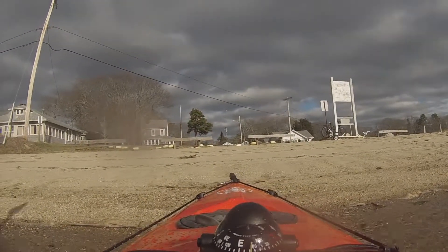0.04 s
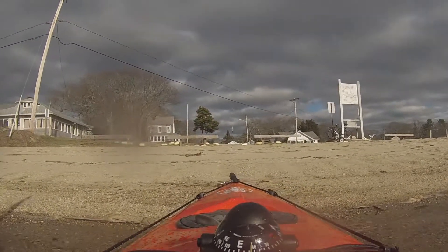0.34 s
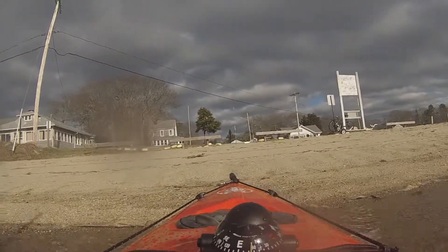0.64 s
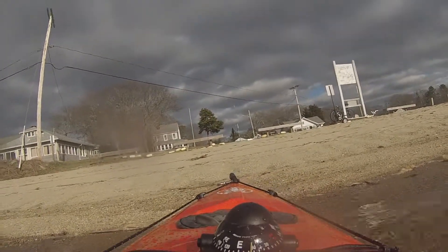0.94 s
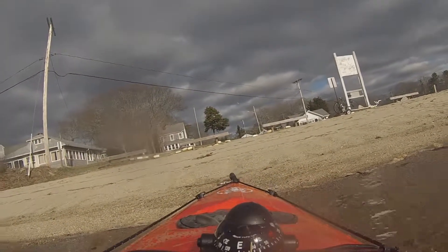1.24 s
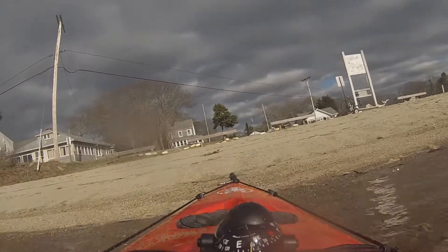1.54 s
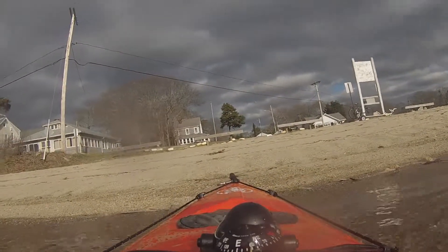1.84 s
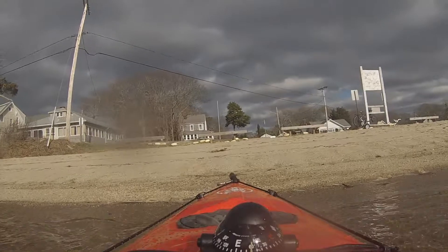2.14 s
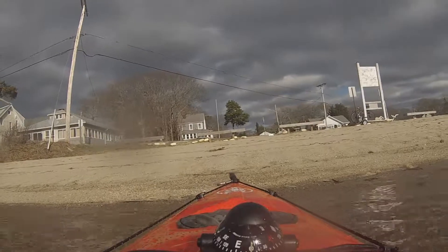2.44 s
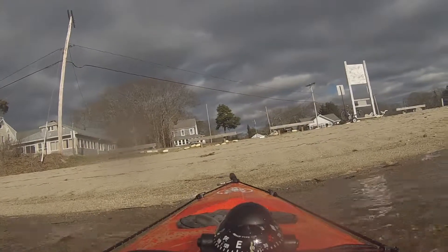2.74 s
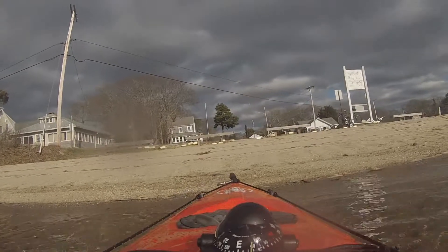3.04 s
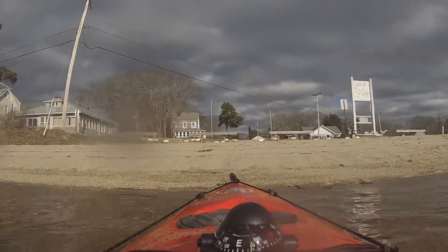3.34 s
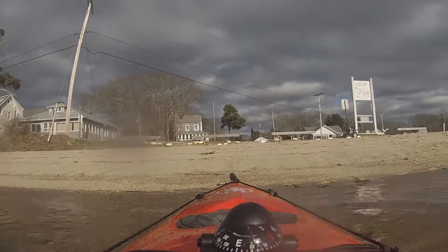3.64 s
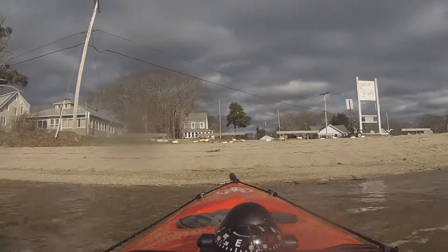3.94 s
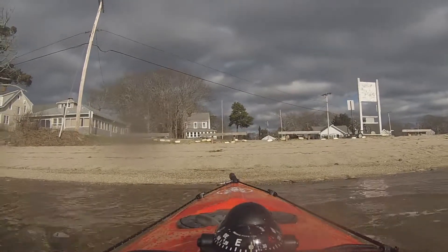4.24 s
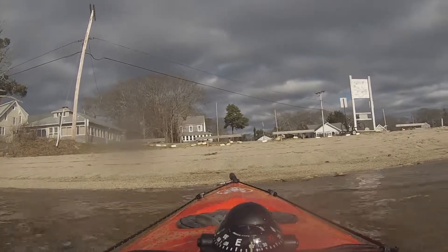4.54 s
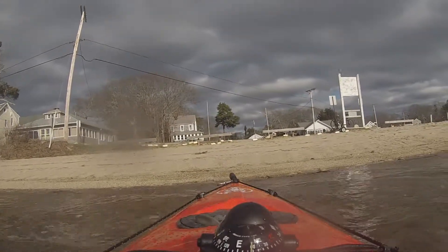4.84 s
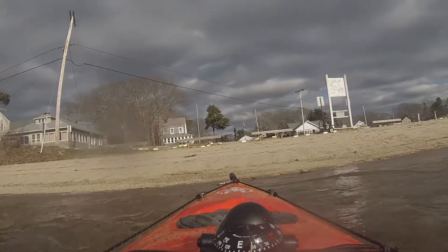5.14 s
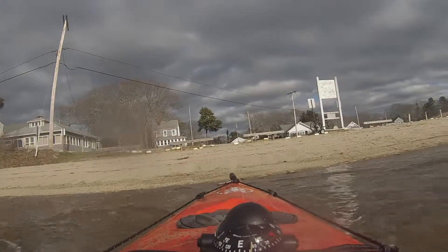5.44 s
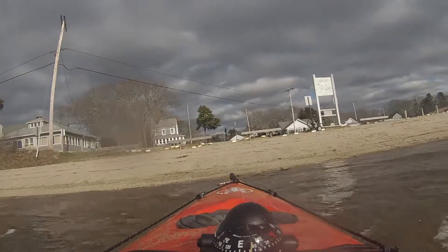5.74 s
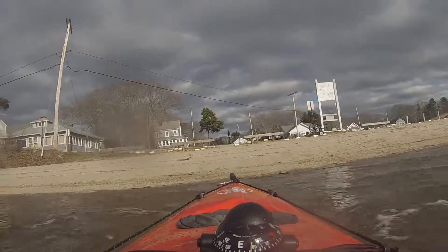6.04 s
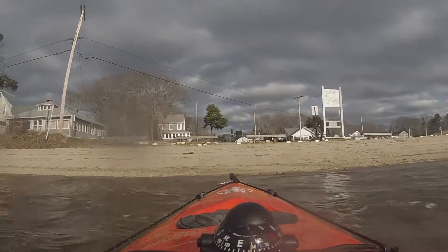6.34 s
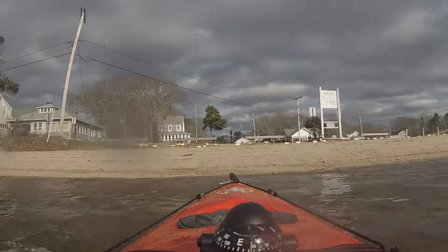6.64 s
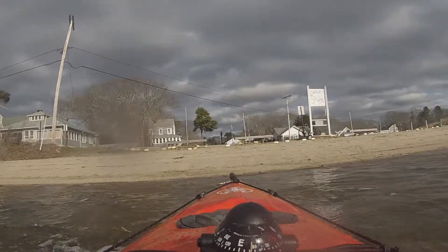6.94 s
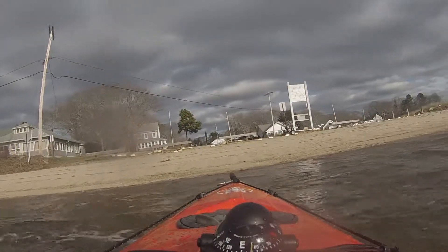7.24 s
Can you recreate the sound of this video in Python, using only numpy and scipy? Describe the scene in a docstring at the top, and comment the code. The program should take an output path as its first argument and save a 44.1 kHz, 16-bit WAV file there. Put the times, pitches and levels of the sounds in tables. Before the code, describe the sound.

A loud hollow bang opens the sound as a plastic kayak is shoved off a gravel beach, heard close from its deck. Stones grind under the booming hull, with crunches near 0.8 seconds and heavy thumps around 0.9 and 1.3 seconds. Meanwhile a paddle digs into wet sand in short hisses. The scraping fades and stops at about 2.2 seconds as the boat floats, and a few drops tick sharply near the microphone.

The rest is much quieter. From 2.7 seconds to the end at about 7.5 seconds, six soft paddle strokes slosh and fizz, roughly one a second, with drips and bubbly plops, the clearest plop near 6.7 seconds. Ripples nudge the hull with small dull knocks that slowly grow. A light wind rumbles and hisses faintly throughout.

```python
"""A plastic kayak is pushed backwards off a gravel beach, heard by a camera on its deck.
First a shove bangs the hollow hull, which booms. Stones then grind under it and make it ring,
while the paddle digs into wet sand. After about two seconds the boat floats free.
Soft paddle strokes slosh, bubble and drip, and ripples nudge the hull.
A light wind rumbles throughout."""
import sys
import numpy as np
from scipy import signal
from scipy.fft import rfft, irfft
from scipy.io import wavfile

SR = 44100
rng = np.random.default_rng(int(sys.argv[2]) if len(sys.argv) > 2 else 0)


def transcribe(signal):
    """Save signal, clipped to [-1, 1], as a 16-bit WAV file at the path in sys.argv[1]."""
    frames = np.atleast_2d(signal).T
    limited = np.clip(frames, -1, 1)
    pcm = np.round(limited * 32767).astype(np.int16)
    wavfile.write(sys.argv[1], SR, pcm)


N = 330309
TIME = np.arange(N) / SR
STERN_WET_S = 1.2  # the back of the boat is in the water by now

# tones at which the hull's plastic walls ring: f/Hz, width/Hz, boost/dB
PANELS = [(160, 16, 4), (220, 40, 3), (350, 18, 5), (392, 30, 4), (648, 22, 5), (746, 26, 5), (910, 80, 5),
          (1152, 110, 8), (1533, 50, 7), (1887, 40, 10), (2520, 240, 8), (3281, 50, 8), (3720, 320, 8),
          (4590, 140, 6), (5050, 170, 9), (5850, 300, 3), (7050, 200, 3), (8603, 70, 7), (9060, 220, 7),
          (10200, 700, 3)]
# tones the camera case boosts in sound from the near side of the boat: f/Hz, width/Hz, boost/dB
NEAR_SIDE = [(1100, 300, 5.5), (1595, 98, 9.5), (2330, 176, 5), (2700, 220, 9), (3680, 500, 12.5),
             (5100, 200, 1), (5910, 250, 8), (6390, 1200, 6.5), (10500, 1300, 6)]
# paddle strokes: t/s, length/s, slosh level/dB, spray level/dB, share from the far side (0 to 1)
STROKES = [(2.7, 0.65, -64.5, -67.5, 0.92), (3.583, 0.78, -60, -62.5, 0.27), (4.841, 0.72, -62.5, -63.5, 1),
           (5.72, 0.83, -61, -65, 0.28), (6.332, 0.56, -63.5, -60, 0.35), (6.99, 1, -60.5, -64.5, 0.65)]


def gain_of(db):
    """Turns decibels into a factor to multiply a sound by."""
    return 10 ** (np.asarray(db) / 20)


def unit_rms(x):
    """Scales a sound to an average size (rms) of 1."""
    return x / np.sqrt(np.mean(x ** 2) + 1e-20)


def unit_peak(x):
    """Scales a sound so that its biggest swing is 1."""
    return x / (abs(x).max() + 1e-20)


def ramp(x):
    """Keeps a value between 0 and 1."""
    return np.clip(x, 0, 1)


def add(mix, s, sound):
    """Mixes a sound in at s seconds."""
    part = mix[max(round(s * SR), 0):][:len(sound)]
    part += sound[:len(part)]


def wander(per_s):
    """A smooth random curve that swings up to about per_s times a second."""
    hz = np.fft.rfftfreq(N, 1 / SR)
    return unit_rms(irfft(rfft(rng.standard_normal(N)) / (1 + (hz / per_s) ** 4), N))


def colour(x, spectrum, modes=(), tilt_db=0, size=8192):
    """Shapes a sound's tone with a broad curve, ringing tones (modes) and a tilt per octave."""
    hz = np.fft.rfftfreq(size, 1 / SR) + 1
    f, db = np.transpose(spectrum)
    db = np.interp(np.log(hz), np.log(f), db) + tilt_db * np.log2(np.maximum(hz, f[1]) / f[1])
    for centre, width, boost in modes:
        db = db + boost / (1 + (2 * (hz - centre) / width) ** 2)
    log_gain = np.log(gain_of(np.r_[db, db[-2:0:-1]]))
    response = np.exp(np.conj(signal.hilbert(log_gain)))  # rings after a hit, never before it
    ring = np.fft.ifft(response).real[:size // 2]
    return signal.oaconvolve(x, ring)[:len(x)]


def clicks(count, per_s, spread_db):
    """Tiny hits at random moments: many small, a few large."""
    sizes = gain_of(spread_db * np.minimum(rng.exponential(1, count), 4.5))
    return sizes * rng.choice([-1, 1], count) * (rng.random(count) < per_s / SR)


def wind():
    """A light breeze: gusty rumble at the microphone and an even hiss from the shore."""
    breeze_tone = [(15, 5.5), (45, 14), (110, 7.5), (190, 4.5), (600, -3), (1800, -9), (4500, -15.5),
                   (8000, -17.5), (11000, -22), (15000, -25.5)]  # steady moving air: f/Hz, level/dB
    air = unit_rms(colour(rng.standard_normal(N), breeze_tone))
    rumble = signal.sosfilt(signal.butter(4, 110, fs=SR, output="sos"), rng.standard_normal(N))
    return gain_of(-60) * air + gain_of(-59 + 2.2 * wander(per_s=6)) * unit_rms(rumble)


def ripple_gain(growth_db_per_s=1.66, swell_db=4):
    """How strong the ripples are: they come in uneven swells and grow away from the shore."""
    db = growth_db_per_s * (TIME - TIME.mean()) + swell_db * wander(per_s=5.9)
    return ramp(TIME - STERN_WET_S) * gain_of(db)


def lapping():
    """Ripples pat the sides of the hull with small dull knocks."""
    pat_tone = [(60, -11), (130, 3.5), (190, -4.5), (300, -14.5), (600, -29), (2000, -49)]  # water patting plastic: f/Hz, level/dB
    strength = gain_of(-76) * ripple_gain()
    return strength * unit_rms(colour(clicks(N, per_s=180, spread_db=3), pat_tone, PANELS))


def bubble(hz, cycles, glide, size=4096):
    """A bubble rings and fades over some cycles, its pitch rising as it nears the surface."""
    turns = hz * np.arange(size) / SR
    age = np.minimum(turns / cycles, 10)
    return np.sin(2 * np.pi * turns * (1 + glide * age)) * np.exp(-age) * (1 - np.exp(-2 * turns))


def froth(low_hz, high_hz, per_s, spread_db, cycles, count=28):
    """Bubbles of many sizes, each size ringing at its own random moments."""
    out = np.zeros(N)
    for hz in np.geomspace(low_hz, high_hz, count) * rng.uniform(.95, 1.05, count):
        ping = np.sqrt(hz) * unit_rms(bubble(hz, cycles, glide=0.014))
        out += signal.oaconvolve(clicks(N, per_s / count, spread_db), ping)[:N]
    return unit_rms(out)


def drips(per_stroke=3, small_db=-50, small_hz=3950, fade_s=0.026):
    """Each drop lands in the water with a short spatter and the ping of a small bubble."""
    big_drops = [(2.3575, -45, 2330), (2.9604, -46.5, 2110), (3.032, -44.5, 4460), (3.0879, -44.5, 2450),
                 (3.269, -47, 4900), (3.4535, -50.5, 3080), (3.8675, -46.5, 2570), (4.1878, -47, 2550),
                 (5.0574, -48, 2080), (5.1896, -47, 2250), (5.2905, -47.5, 2700), (5.3474, -51, 3300),
                 (5.501, -47.5, 3800), (5.7583, -49, 3600), (6.6233, -42.5, 4030), (6.6375, -45, 4400)]  # the loudest drops: t/s, level/dB, f/Hz
    out, t = np.zeros(N), np.arange(4096) / SR
    # smaller drops run off the blade in the second half of each stroke
    small_drops = [(s + length * (1 + late) / 2, small_db, small_hz * 2 ** (pitch - .5))
                   for s, length, *_ in STROKES for late, pitch in rng.random((per_stroke, 2))]
    for s, db, hz in list(big_drops) + small_drops:
        spatter = rng.standard_normal(len(t)) * (1 - np.exp(-t / .0012)) * gain_of(-60 * t / fade_s)
        splash = unit_peak(colour(spatter, [(hz / 4, -20), (hz, 0), (hz * 2, -7), (hz * 4, -34)]))
        add(out, s, gain_of(db - 2) * splash)
        add(out, s + .001, gain_of(db - 4) * bubble(hz, cycles=17, glide=.009))
    return out


def drops_on_case():
    """A drop hits the stiff camera case: one dry snap and a trace of spatter."""
    hits = [(1.4355, -41, 10500), (1.4406, -36, 7000), (2.098, -41, 4300), (2.173, -30, 4160),
            (5.76, -37, 2820), (6.858, -35, 4140)]  # drops on the case: t/s, level/dB, middle f/Hz
    out, t = np.zeros(N), np.arange(2048) / SR
    for s, db, hz in hits:
        snap = (t == 0) + 0.1 * rng.standard_normal(len(t)) * gain_of(-60 * t / 0.0086)
        tone = [(hz / 3, -30), (hz * 0.79, -8), (hz * 0.63, 0),
                (hz * 1.33, -1), (hz * 1.6, -13), (hz * 3, -21)]
        add(out, s, gain_of(db - 1.5) * unit_peak(colour(snap, tone)))
    return out


def plops(pieces=5):
    """Water closes over a pocket of air, which breaks into a few smaller bubbles."""
    pockets = [(2.96, -46, 915), (3.616, -43, 615), (3.71, -40, 1190), (3.729, -44.5, 385),
               (3.869, -43, 1073), (4.162, -49.5, 381), (4.816, -46.5, 464), (4.944, -46.5, 1100),
               (5.865, -41.5, 352), (6.129, -45, 313), (6.723, -34, 820), (7.048, -42, 1160),
               (7.107, -44, 920)]  # air trapped around blade and hull: t/s, level/dB, f/Hz
    out = np.zeros(N)
    for s, db, hz in pockets:
        add(out, s, gain_of(db - 5.5) * bubble(hz, cycles=5, glide=0.031))
        for delay, pitch in rng.random((pieces, 2)):
            piece = bubble(hz * 2 ** (1.56 * pitch - .5), cycles=5, glide=0.047)
            add(out, s + 0.016 * delay, gain_of(db - 18.5) * piece)
    return out


def water_gains(catch_s=0.12, fade_db_per_s=11, build_s=0.22, lift_s=0.19, slap_s=0.026):
    """How strong slosh and spray are: calm water, paddle strokes and slaps add up in power."""
    slaps = [(4.45, -59, -86), (6.14, -58, -58), (6.445, -62, -53.5), (6.64, -75, -67), (6.729, -54.5, -60),
             (7.48, -56.5, -58)]  # small waves slapping the boat: t/s, slosh level/dB, spray level/dB
    wet = ramp(TIME / STERN_WET_S) ** 4
    parts = [(gain_of(-69) * wet, gain_of(-65.5) * wet)]  # slosh and spray of calm water
    # the blade catches and the slosh dies away, while spray builds until the blade lifts out
    for s, length, slosh_db, spray_db, _ in STROKES:
        age = np.clip(TIME - s, 0, length)
        blade_in = ramp((length - age) / lift_s)
        slosh = ramp(age / catch_s) * gain_of(slosh_db - fade_db_per_s * (age - catch_s))
        spray = ramp(age / build_s) * gain_of(spray_db)
        parts.append((blade_in * slosh, blade_in * spray))
    for s, slosh_db, spray_db in slaps:
        burst = 1 / (1 + ((TIME - s) / slap_s) ** 2)
        parts.append((gain_of(slosh_db) * burst, gain_of(spray_db) * burst))
    return np.sqrt(sum(np.square(part) for part in parts))


def water():
    """Large bubbles gurgle in the slosh; fine spray and small bubbles fizz above them."""
    slosh_tone = [(100, -18), (220, -3.5), (400, -1), (700, -3), (1200, -5), (1800, -9), (3000, -34),
                  (8000, -58)]  # stirred water: f/Hz, level/dB
    spray_tone = [(500, -12), (1400, -15), (2200, 2.5), (3100, -4.5), (4600, -5), (6300, -11), (7800, -12),
                  (10500, -12), (11700, -18), (15000, -19)]  # fine spray: f/Hz, level/dB
    gurgle = froth(low_hz=263.4, high_hz=2390, per_s=450, spread_db=2.5, cycles=8.5)
    gurgle += gain_of(1) * rng.standard_normal(N)
    fizz = froth(low_hz=1373, high_hz=7000, per_s=1500, spread_db=3, cycles=5.9)
    fizz += gain_of(1) * unit_rms(clicks(N, per_s=6000, spread_db=3.5))
    droplets = clicks(N, per_s=60, spread_db=9.5)
    mist = unit_rms(signal.sosfilt(signal.butter(2, 7000, "high", fs=SR, output="sos"), droplets))
    fizz += gain_of(-9.5) * mist
    slosh = unit_rms(colour(gurgle, slosh_tone)) * gain_of(0.65 * wander(per_s=6.3))
    spray = unit_rms(colour(fizz, spray_tone)) * gain_of(-2.23 + 0.76 * wander(per_s=34))
    slosh_gain, spray_gain = water_gains()
    return slosh * slosh_gain + spray * spray_gain


def camera_case(x):
    """The case colours sound from the air, depending on which side the paddle is working."""
    far_side = [(1100, 440, 5.4), (1526, 250, 4), (2090, 126, 5.7), (2780, 170, 5.2), (3400, 450, 6.3),
                (4485, 77, 5.9), (5110, 69, 8.3), (5760, 520, 7.4), (10560, 1200, 3.6)]  # tones boosted from the far side: f/Hz, width/Hz, boost/dB
    sides = [(s + part * length, share) for s, length, _, _, share in STROKES for part in (0, .9)]
    far = ramp(np.interp(TIME, *np.transpose(sides)))
    flat = [(1, 0), (SR, 0)]
    return gain_of(-3.5) * (far * colour(x, flat, far_side) + (1 - far) * colour(x, flat, NEAR_SIDE))


def paddle_in_sand():
    """Grains of wet sand hiss along the blade."""
    digs = [(0.106, -47, 0.15, 0.5), (0.225, -59, 0.1, 2.5), (0.33, -56.5, 0.083, 3),
            (1.175, -55.5, 0.11, -2), (1.401, -51, 0.089, -5), (1.676, -56, 0.05, -2)]  # pushes of the blade: t/s, level/dB, length/s, brightness/(dB per octave)
    sand_tone = [(300, -21), (1000, -7), (2400, 2), (3100, -3.5), (4800, -10.5), (6500, -9), (8000, -14),
                 (11000, -20.5), (15000, -29)]  # wet sand: f/Hz, level/dB
    out = np.zeros(N)
    for s, db, length, bright in digs:
        count = int(length * SR)
        grains = colour(clicks(count, per_s=36000, spread_db=3), sand_tone, NEAR_SIDE, tilt_db=bright)
        add(out, s, gain_of(db) * unit_rms(grains) * signal.windows.tukey(count, .7))
    return out


def weight_gain(follow, full_weight_db=-43, afloat_s=2.25, lift_off_s=0.065):
    """A sound gains `follow` dB for each dB of weight on the stones, and stops as the boat floats."""
    weight = [(0.1, -54), (0.37, -52), (0.48, -47.5), (0.85, -42.5), (1.1, -44.5), (1.32, -41),
              (1.62, -48.5), (1.8, -57), (2.15, -65.5)]  # how hard the sliding hull presses on the gravel: t/s, level/dB
    db = np.interp(TIME, *np.transpose(weight)) - full_weight_db
    return gain_of(follow * db) * ramp((afloat_s - TIME) / lift_off_s)


def scrape():
    """Thousands of stones catch and slip under the hull, in clumps, until it floats."""
    hull_tone = [(40, -17), (110, 13), (160, 5), (280, -2.5), (400, -2), (500, -0.5), (580, -11.5),
                 (1100, -11.5), (1400, -15.5), (1750, -23.5), (2400, -26.5), (3100, -31.5), (7500, -40.5),
                 (15000, -55)]  # the hull's broad response: f/Hz, level/dB
    stones = unit_rms(clicks(N, per_s=3400, spread_db=2)) * gain_of(wander(per_s=40))
    ringing = colour(stones, hull_tone, PANELS)
    lows = signal.sosfiltfilt(signal.butter(3, 740, fs=SR, output="sos"), ringing)
    body = gain_of(-39) * weight_gain(follow=0.88) * unit_rms(lows)
    grit = gain_of(-48) * weight_gain(follow=0.81) * unit_rms(ringing - lows)
    return body + grit


def crunches():
    """A larger stone grinds free in a quick burst of slips, which make the hull's walls ring."""
    # stones cracking out from under the boat: t/s, level/dB, length/s, brightness/(dB per octave)
    stones = [(.001, -37.5, 0.0031, 3.5), (0.029, -49.5, 0.0039, -1.5), (0.086, -51, .004, -0.5),
              (0.452, -53, .004, 1.5), (.505, -58, .006, 4), (0.57, -60, 0.0052, 7),
              (0.775, -44, 0.01, 1.5), (0.796, -40, 0.0094, 1.2), (0.843, -41, 0.005, 1.5),
              (0.933, -51, 0.0048, 2), (1.418, -51, 0.0065, -0.5)]
    stone_tone = [(250, -21.5), (450, -7), (650, -5), (1200, 3), (1450, 0.5), (1800, -6), (2500, -2.5),
                  (3100, -12), (5000, -15), (7500, -24.5), (9500, -25.5), (11000, -34.5), (15000, -44)]  # a slipping stone: f/Hz, level/dB
    out, t = np.zeros(N), np.arange(SR // 8) / SR
    for s, db, length, bright in stones:
        swell = t * np.exp(-(t / length) ** 2) + 0.088 * t * np.exp(-t / length)
        slips = clicks(len(t), per_s=13000, spread_db=2) * swell
        burst = colour(slips, stone_tone, PANELS, tilt_db=bright)
        add(out, s, gain_of(db) * burst / np.std(burst[:int(2 * length * SR)]))
    return out


def knock(start_s=0.00081, peak_db=-13.5, fade_s=0.032):
    """The first shove bangs the hull on the stones, and its walls give a short hollow clack."""
    clack_tone = [(120, 6.5), (250, 5), (370, -5), (490, -4), (680, -1), (1000, -6.5), (1600, -25.5),
                  (5000, -44.5)]  # the hard-hit hull: f/Hz, level/dB
    out, t = np.zeros(N), np.arange(SR // 8) / SR
    rattle = rng.standard_normal(len(t)) * gain_of(-60 * t / fade_s)
    add(out, start_s, gain_of(peak_db) * unit_peak(colour(rattle, clack_tone)))
    return out


def boom(hz=86, width_hz=25, fade_s=0.22):
    """The hollow hull's lowest tone: shaken by stones, then by ripples, and struck now and then."""
    thumps = [(0.0, -0.8, 0.0047), (0.148, -25, 0.011), (0.261, -27, 0.034), (0.399, -22.5, 0.016),
              (0.653, -22.5, 0.0087), (0.877, -13.5, 0.022), (1.232, -20.5, 0.011), (1.306, -13.5, 0.02),
              (1.513, -23, 0.0072), (2.111, -43.5, 0.02), (2.231, -37, 0.0066), (2.374, -41, 0.0092),
              (2.781, -44, 0.018), (3.349, -44, 0.0089), (4.046, -42.5, 0.0057), (4.458, -43.5, 0.0068),
              (4.539, -41, 0.017), (5.456, -37.5, 0.015), (5.865, -37.5, 0.022), (6.055, -42, 0.01),
              (6.422, -42, 0.0078), (6.727, -34.5, 0.0075), (6.945, -41, 0.0056), (7.061, -41.5, 0.046),
              (7.125, -36, 0.015)]  # blows to the hull: t/s, level/dB, build-up/s
    decay = np.exp(-np.pi * width_hz / SR)
    pole = [1, -decay * np.exp(2j * np.pi * hz / SR)]
    sway = rng.standard_normal(N)
    for _ in range(2):  # keep only the noise close to the hull's tone
        sway = signal.lfilter([1 - decay], pole, sway)
    sway = unit_rms(sway.real / (abs(sway) + 1e-12) ** (1 / 4))  # large swings are damped more
    out = (gain_of(-27) * weight_gain(follow=1.29) + gain_of(-62.5) * ripple_gain()) * sway
    t = np.arange(SR // 2) / SR
    for s, db, build in thumps:
        swell = (1 - np.exp(-(t / build) ** 2)) * gain_of(-60 * t / fade_s)
        add(out, s, -gain_of(db) * unit_peak(swell) * np.sin(2 * np.pi * hz * t))
    return out


def scene():
    """Hull sounds come through the deck, water and wind through the air."""
    hull = knock() + scrape() + crunches() + boom() + lapping()
    mix = hull + paddle_in_sand() + plops() + drops_on_case() + camera_case(water() + drips() + wind())
    return mix[None]


def record(dry, low_hz=28, high_hz=15200):
    """The camera cuts the deepest rumble and the highest treble."""
    thinned = signal.sosfilt(signal.butter(2, low_hz, "high", fs=SR, output="sos"), dry)
    treble_cut = signal.firwin(511, high_hz, window=("kaiser", 9), fs=SR)
    return signal.oaconvolve(thinned, treble_cut[None], "same")


dry = scene()
out = record(dry)
transcribe(out)
```